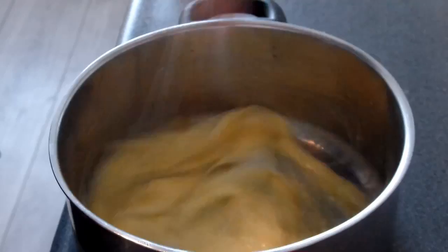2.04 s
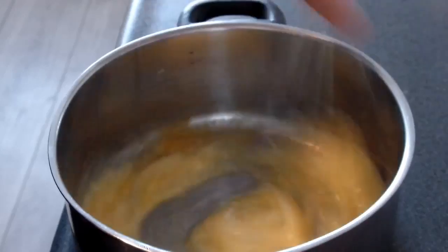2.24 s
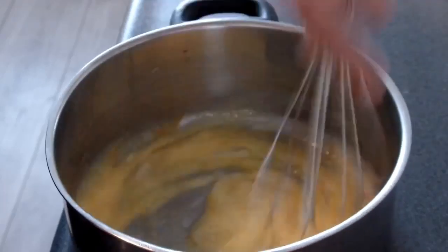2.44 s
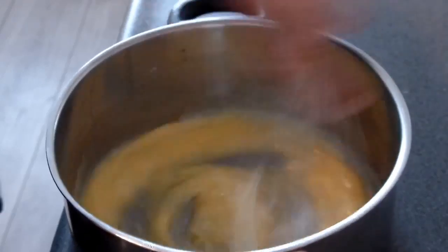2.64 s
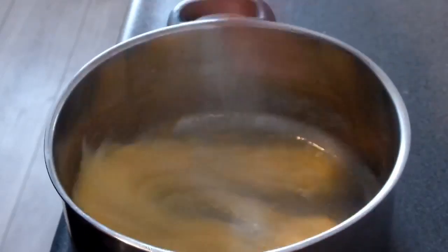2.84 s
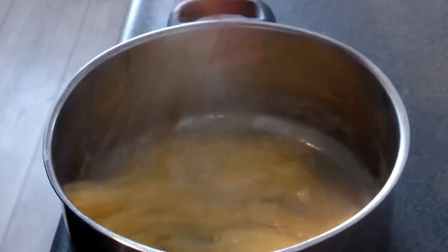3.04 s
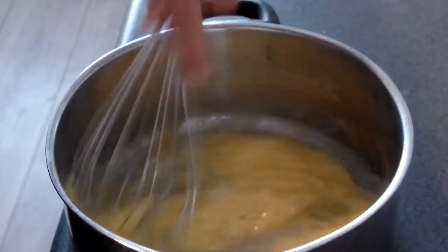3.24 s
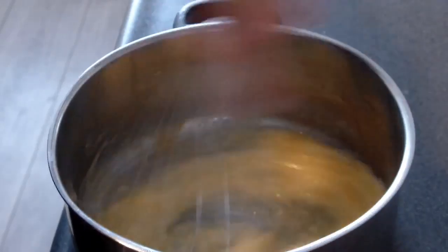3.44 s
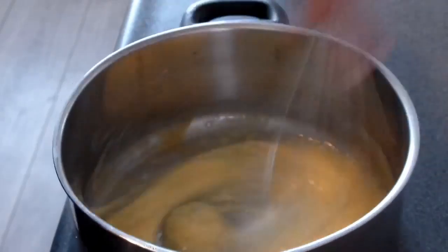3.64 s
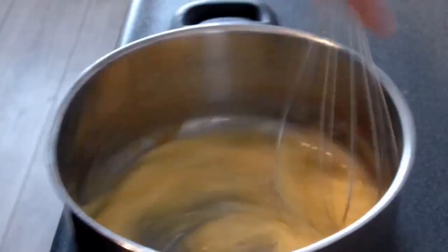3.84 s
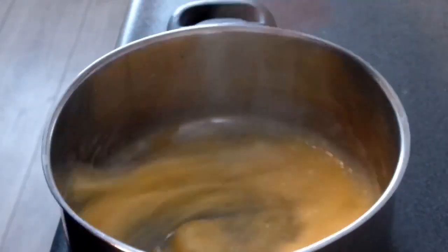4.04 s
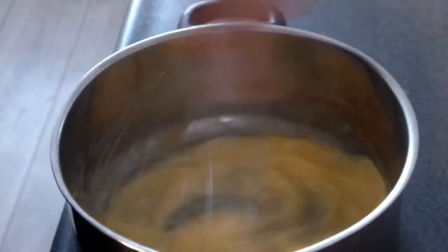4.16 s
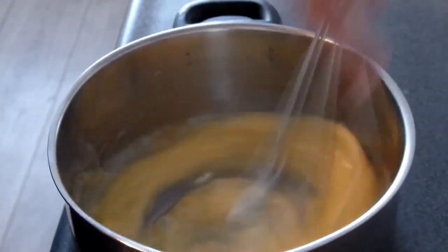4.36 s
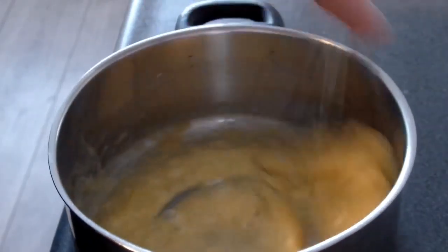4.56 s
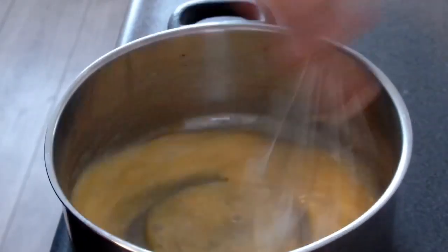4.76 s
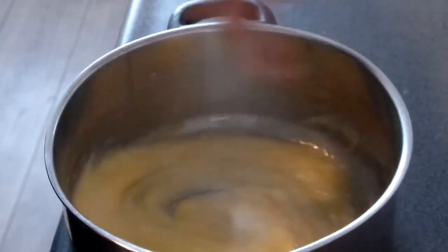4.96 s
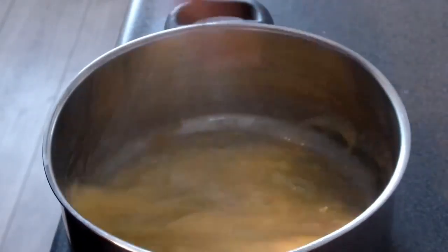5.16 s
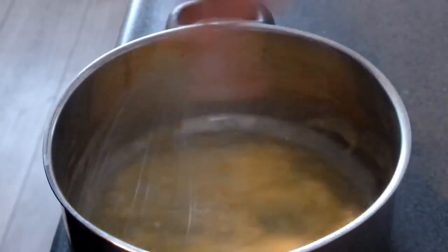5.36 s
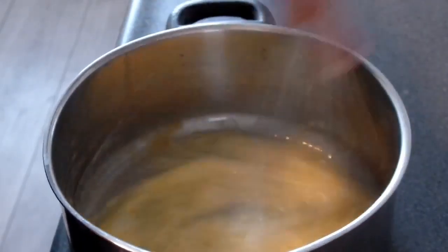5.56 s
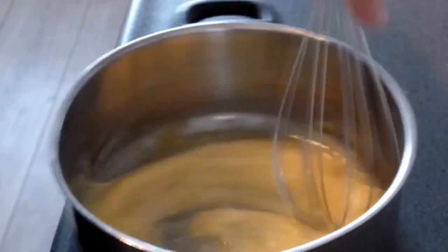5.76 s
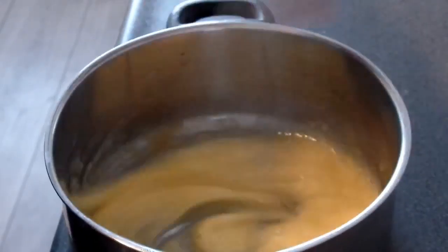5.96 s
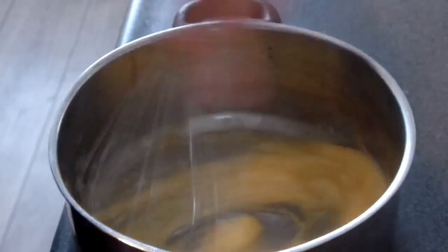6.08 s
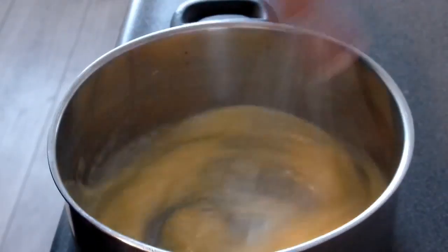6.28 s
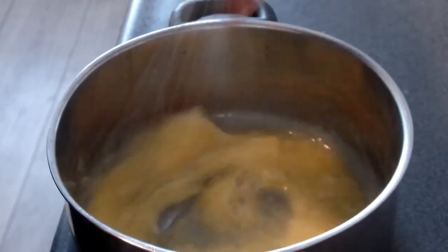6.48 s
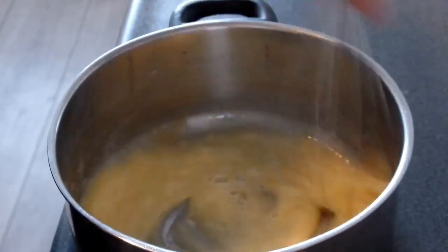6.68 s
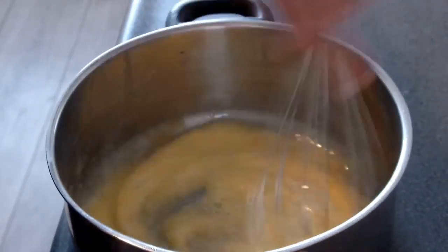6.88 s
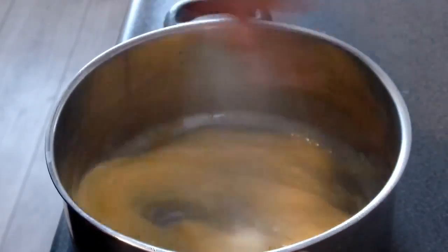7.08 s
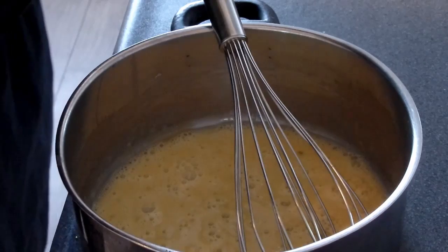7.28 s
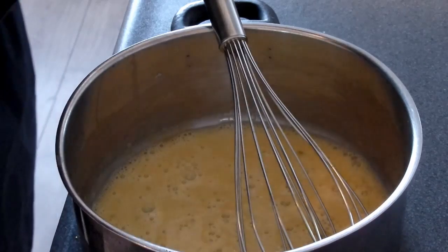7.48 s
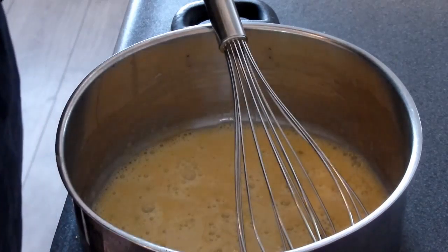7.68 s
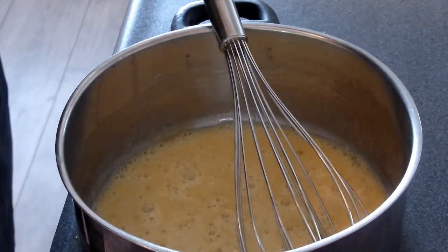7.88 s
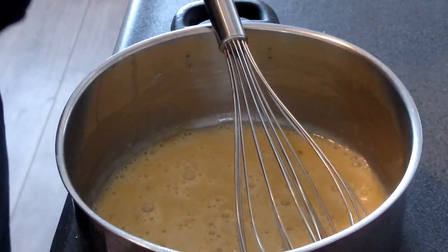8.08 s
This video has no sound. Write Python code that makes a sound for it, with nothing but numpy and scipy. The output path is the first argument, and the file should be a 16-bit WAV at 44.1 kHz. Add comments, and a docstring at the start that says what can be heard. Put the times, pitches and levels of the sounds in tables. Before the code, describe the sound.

Continuous brisk whisking in a metal pot, heard very near in a small tiled kitchen. Thin wires hit the steel wall in quick clustered clinks, dense and bright, fading within a quarter second so strokes run together. Light gritty scraping and liquid slosh fill the gaps, with faint low thumps as the pot rocks. Strokes start even, turn irregular and doubled, and finish hard and regular before weakening slightly.

```python
"""Whisk in a steel pot

Small hard kitchen, a phone close to a steel pot on the hob: a wire whisk beats eggs, about nine strokes a second.
At each turn the wires strike the wall one after another: noise cracks and decaying sines ring the damped steel.
Between turns stick-slip clicks scrape over the bottom and bands of noise churn as egg; weighty blows slap the egg
and rock the pot on the hob. A fading noise tail answers as tiles and cupboards, over a low uneven rumble."""
import sys
import numpy as np
from scipy import signal
from scipy.fft import rfft, irfft
from scipy.io import wavfile
from scipy.ndimage import uniform_filter1d

SR = 44100
rng = np.random.default_rng(int(sys.argv[2]) if len(sys.argv) > 2 else 0)


def transcribe(u):
    """Save the signal u as a 16-bit wav file named by the first command-line argument.

    u: samples, shape (n,) or (channels, n), limited to [-1, 1]; the rate is SR.
    q: integer samples, one column per channel.
    """
    v = np.clip(np.atleast_2d(u).T, -1, 1)
    q = np.round(v * 32767).astype(np.int16)
    wavfile.write(sys.argv[1], SR, q)


N = 358091
HZ = np.fft.rfftfreq(N, 1 / SR)

# blows on the wall; a weighty blow carries egg and hand behind it
# columns: t/s, strength level/dB, weight level against strength/dB, ring t60/s before the register's share
WALL_BLOWS = [(0.034, -6, -24, 0.19), (0.1414, -7, -20, 0.13), (0.2437, -7.5, -15, 0.22),
              (0.3536, -11, -11, 0.25), (0.451, -6, -15.5, 0.23), (0.5607, -8.5, -17.5, 0.23),
              (0.6592, -8, -19, 0.22), (0.7557, -14, -16, 0.22), (0.8624, -11, -13.5, 0.25),
              (0.964, -10.5, -14, 0.29), (1.0746, -10, -14, 0.26), (1.1814, -5.5, -7, 0.23),
              (1.29, -7, -13, 0.28), (1.3995, -6.5, -12.5, 0.23), (1.502, -7.5, -15, 0.25),
              (1.6092, -6.5, -11.5, 0.23), (1.725, -8, -14.5, 0.25), (1.8367, -9.5, -9.5, 0.24),
              (1.9642, -11, -17.5, 0.25), (2.0934, -9, -20.5, 0.35), (2.178, -15, -10, 0.37),
              (2.32, -18.5, -13, 0.25), (2.358, -12, -17, 0.45), (2.4212, -7.5, -8.5, 0.39),
              (2.6172, -10, -14.5, 0.44), (2.6618, -12.5, -11, 0.19), (2.6747, -16, -29, 0.25),
              (2.7509, -7, -13, 0.19), (2.8524, -16.5, -11, 0.25), (2.8802, -5, -14, 0.28),
              (2.9906, -8.5, -16, 0.28), (3.1004, -8, -13, 0.24), (3.2086, -6.5, -17.5, 0.24),
              (3.3224, -10.5, -12.5, 0.27), (3.464, -12.5, -12.5, 0.28), (3.5708, -5.5, -13, 0.22),
              (3.6707, -12, -10, 0.22), (3.711, -14, -16.5, 0.18), (3.7997, -12, -10, 0.29),
              (3.8104, -11.5, -15, 0.19), (3.93, -14, -7, 0.33), (3.9537, -15.5, -9, 0.33),
              (4.0491, -6, -12, 0.21), (4.0539, -9.5, -26, 0.3), (4.1589, -15, -10.5, 0.45),
              (4.199, -13, -15, 0.2), (4.3055, -5.5, -14, 0.2), (4.4151, -15, -12, 0.33),
              (4.5293, -13.5, -14, 0.28), (4.6418, -14.5, -17, 0.25), (4.687, -10.5, -16, 0.22),
              (4.7576, -11.5, -8.5, 0.41), (4.7784, -11.5, -13, 0.33), (4.795, -11.5, -8, 0.19),
              (4.8687, -14, -12, 0.25), (4.946, -21.5, 0.5, 0.22), (4.999, -13.5, -7.5, 0.29),
              (5.034, -17.5, -21, 0.29), (5.097, -20, -3, 0.35), (5.134, -8, -10, 0.3),
              (5.1496, -14, -25, 0.18), (5.2357, -2, -17, 0.28), (5.3479, -4.5, -17, 0.21),
              (5.4723, -5.5, -11, 0.2), (5.6062, -6.5, -9.5, 0.21), (5.7243, -7, -11, 0.25),
              (5.8182, -12.5, -9.5, 0.38), (5.8474, -15.5, -21, 0.25), (5.9486, -5.5, -11.5, 0.21),
              (6.0696, -14.5, -11.5, 0.25), (6.0793, -8, -13, 0.19), (6.2013, -7, -12.5, 0.29),
              (6.3039, -13.5, -9.5, 0.27), (6.3271, -12, -10.5, 0.27), (6.4967, -12, -14, 0.29),
              (6.6218, -20, 2.5, 0.3), (6.6348, -11.5, -10.5, 0.45), (6.7325, -9.5, -9.5, 0.33),
              (6.7448, -6.5, -15, 0.2), (6.7881, -12, -12, 0.36), (6.8294, -7.5, -10.5, 0.25),
              (6.8755, -12.5, -14, 0.13), (6.9846, -12, -12.5, 0.24), (7.1251, -2.5, -13.5, 0.21),
              (7.2205, -5, -12, 0.28), (7.3427, -6, -12, 0.25), (7.4438, -7, -13.5, 0.23),
              (7.5614, -9.5, -14, 0.27), (7.6817, -8.5, -15, 0.25), (7.797, -12.5, -11, 0.15),
              (7.8055, -12.5, -24, 0.29), (7.9149, -18, -13, 0.41), (7.9488, -17.5, -10, 0.22),
              (8.0416, -13.5, -10, 0.38)]
# wires dragged through the egg over the bottom; columns: t/s, slosh level/dB, scrape level/dB
STIRRING = [(0.0, -41, -32), (0.52, -41.5, -37), (0.9, -48, -41), (1.38, -44.5, -35.5),
            (2.15, -43.5, -39.5), (2.85, -36.5, -35), (3.48, -42.5, -39), (4.66, -39.5, -39),
            (5.2, -38.5, -37.5), (6.08, -43, -37), (6.56, -41.5, -43.5), (6.79, -40.5, -32),
            (7.08, -42.5, -37.5), (7.3, -43, -34), (7.73, -42, -42), (8.12, -39.5, -38)]
# registers of the pot; columns: low edge f/Hz, high edge f/Hz, share of the ring time, rise time constant/ms,
# crack level of a hard blow/dB
POT_REGISTERS = [(306, 740, 0.99, 7.2, 7.5), (963, 3480, 1.3, 2.6, 10.5), (3870, 4370, 1.25, 0.51, 12),
                 (5050, 10370, 1.465, 0.076, 7.5), (10100, 20000, 0.78, 0.19, 7.5)]
# strongest modes of pot and whisk; columns: f/Hz, level against the register/dB, t60/s
POT_MODES = [(487, -1, 0.099), (593.8, -4, 0.28), (781, -5.5, 0.21), (1249, -10, 0.13), (1380, 6, 0.047),
             (1796, -6.5, 0.24), (2528, -5, 0.12), (2440, -23, 0.16), (2833, -6.5, 0.17),
             (3837, -5.5, 0.56), (4010, -9, 0.34), (3945, -17, 0.26), (4540, -14, 0.43), (3985, 2.5, 0.18),
             (4554, 1, 0.26), (4400, -13, 0.32), (4600, -10.5, 0.37), (5180, -10, 0.2), (5350, -11, 0.2),
             (5690, -27, 0.17), (5930, -4, 0.066), (6040, -30.5, 0.14), (6290, -27, 0.16),
             (6900, -28, 0.097), (7420, -5, 0.059), (7970, -2.5, 0.068), (8190, 0, 0.034),
             (8600, -4.5, 0.13), (9080, -7.5, 0.12)]
# colour of the dense modes; columns: f/Hz, level per Hz/dB
STEEL_COLOUR = [(180, -42), (300, -14.5), (530, -11.5), (770, -2.5), (1080, -1), (1250, 0), (1520, -5),
                (1820, -1), (3380, -1), (3980, 3.5), (4830, 1), (8000, 2), (10200, -0.5), (13900, 10),
                (14600, 3.5)]
# colour of the room's rumble; columns: f/Hz, level per Hz/dB
RUMBLE_COLOUR = [(13, -39), (22, -4), (59, -30), (130, -1.5), (188, -16.5), (312, -2), (411, -21), (500, 1),
                 (650, -17), (1100, -120)]
# how unlike the two ports hear the pot; columns: f/Hz, side minus mid level/dB
PORT_WIDTH = [(60, -10), (110, -10), (200, -8), (380, -10), (700, -12), (1290, -15), (2380, -17),
              (4400, -17.5), (8120, -16), (15000, -5)]
# level against strength for a blow of usual weight; columns: body, wall, rim, bright steel, wire tips level/dB
REGISTER_VOICE_DB = (-19, -12.5, -12, -2, -7)
# how much weight feeds the low registers; columns: body, wall (dB per dB of extra weight)
LOW_WEIGHT_SHARE = (1.1, .3)

USUAL_WEIGHT_DB = -15
SPOT_SCATTER_DB = 1.5  # each blow lands on another spot and favours other registers
# slap and rocking: level of a usual blow, lag behind the blow, dB per dB of extra weight
SLAP_DB, SLAP_LAG_S, SLAP_SHARE = -28, 0.014, .8
HOB_DB, HOB_LAG_S, HOB_SHARE = -36, 0.018, .9
THUD_SCATTER_DB = 3  # slap and rocking differ from blow to blow
RUMBLE_DB, RUMBLE_SWING_DB = -62, 8.45  # middle level, spread of its wandering
ECHO_DB, ECHO_T60_S = -15, .3
TOP_HZ = 14450


def undb(db):
    """Amplitude of a level in dB."""
    return 10 ** (np.asarray(db) / 20)


def unit(x):
    """Scale to an rms of 1."""
    return x / np.sqrt(np.mean(x ** 2))


def shape(points):
    """Gain at every frequency from (f/Hz, level/dB) points."""
    hz, db = np.transpose(points)
    return undb(np.interp(np.log(HZ + 1), np.log(hz), db))


def band(lo_hz, hi_hz, order=8):
    """Band-pass gain at every frequency; a higher order is steeper."""
    below = (lo_hz / (HZ + 1)) ** (2 * order)
    above = (HZ / hi_hz) ** (2 * order)
    return 1 / np.sqrt((1 + below) * (1 + above))


def colour(x, gain):
    """Filter by a gain at every frequency."""
    return irfft(rfft(x) * gain, N)


def noise(gain):
    """Coloured noise with an rms of 1."""
    return unit(colour(rng.standard_normal(N), gain))


def walk(rate_hz):
    """Random levels held 1 / rate_hz seconds and slewed twice; rms 1."""
    hold = int(SR / rate_hz)
    steps = np.repeat(rng.standard_normal(N // hold + 1), hold)
    return unit(uniform_filter1d(uniform_filter1d(steps, hold), hold)[:N])


def fade(t, t60):
    """Exponential decay by 60 dB in t60 seconds, never quicker than 0.03 s."""
    return np.exp(-np.log(1000) * t / max(t60, .03))


def impulses(times, dbs):
    """One click of the given level at each moment."""
    clicks = np.zeros(N)
    clicks[(times * SR).astype(int)] = undb(dbs)
    return clicks


def swells(times, dbs, rise_s, t60):
    """A soft rise and a decay from each moment."""
    t = np.arange(int(SR / 2)) / SR
    swell = (1 - np.exp(-t / rise_s)) * fade(t, t60)
    return signal.fftconvolve(impulses(times, dbs), swell)[:N]


def kitchen(dry):
    """Diffuse echo from tiles and cupboards, its treble dying first, over an uneven low rumble."""
    t = np.arange(SR) / SR
    white = rng.standard_normal(SR)
    dull = signal.lfilter([.3], [1, -.7], white)
    tail = dull * fade(t, ECHO_T60_S) + (white - dull) * fade(t, 0.22 * ECHO_T60_S)
    tail = tail * (1 - np.exp(-t / 0.0093))
    rumble = undb(RUMBLE_DB + RUMBLE_SWING_DB * walk(12)) * noise(shape(RUMBLE_COLOUR))
    echo = signal.fftconvolve(dry, tail / np.linalg.norm(tail))[:N]
    return undb(ECHO_DB) * echo + rumble


def slosh(db, waver_db=4, tilt_db=-1):
    """Egg round the pot: a soft wet wash of narrow noise bands, each wavering at random, surging after every blow."""
    centres_hz = 330 * 2 ** np.arange(0, 3.4, 1 / 3)
    wash = 0
    for k, hz in enumerate(centres_hz):
        # the two edges almost meet: a narrow hump
        narrow = colour(rng.standard_normal(N), band(hz / 1.19, hz * 0.85, order=3))
        wash = wash + narrow * undb(waver_db * walk(18) + tilt_db * k)
    s, strength_db = np.transpose(WALL_BLOWS)[:2]
    surge = 1.1 + unit(swells(s, 0.94 * strength_db, 0.0077, 0.15))
    return unit(colour(wash, shape(STEEL_COLOUR)) * surge) * undb(db)


def thuds():
    """The egg slaps the wall with a dull lumpy push; the rocking pot makes the hob top boom near 120 Hz."""
    s, db, weight_db = np.transpose(WALL_BLOWS)[:3]
    extra_db = weight_db - USUAL_WEIGHT_DB
    slap_chance_db, hob_chance_db = THUD_SCATTER_DB * rng.standard_normal((len(s), 2)).T
    slap_db = slap_chance_db + db + SLAP_DB + SLAP_SHARE * extra_db
    hob_db = hob_chance_db + db + HOB_DB + HOB_SHARE * extra_db
    egg = noise(band(208.0, 376.0, order=3)) * undb(0.82 * walk(25))
    boom = np.sin(2 * np.pi * np.cumsum(119 + 9 * walk(8.9)) / SR)
    boom = boom + .5 * noise(band(110.0, 160.0, order=2))
    slap = swells(s + SLAP_LAG_S, slap_db, 0.032, 0.19) * egg
    return slap + swells(s + HOB_LAG_S, hob_db, 0.038, 0.2) * boom


def skid(lead_db=-21, lead_s=0.0067):
    """Level of the scrape that builds up as the wires run up the curve towards each blow."""
    s, db = np.transpose(WALL_BLOWS)[:2]
    decay = np.exp(-np.arange(SR // 8) / SR / lead_s)
    # a decay run backwards in time is a build-up
    return signal.fftconvolve(impulses(s, db + lead_db)[::-1], decay)[:N][::-1]


def scrape(gain, slips_a_second=4000, scatter_db=5):
    """Tiny stick-slip clicks excite the steel; its strong modes show as narrow peaks."""
    slips = rng.random(N) < slips_a_second / SR
    clicks = slips * undb(scatter_db * rng.random(N)) * rng.standard_normal(N)
    peaks = sum(undb(db) / np.abs(1 + 1j * (HZ - f) * t60 / 5.3) for f, db, t60 in POT_MODES)
    steel = shape(STEEL_COLOUR) * band(1340.0, 7400.0, order=1) * (1 + undb(-4.5) * peaks)
    return unit(colour(clicks, steel)) * gain


def wires(luck, within_ms, scatter_db=4, chatter_ms=40, chatter_db=-9, lead_db=6):
    """Half the contacts are wires landing in quick turn, half their weaker chatter afterwards; total energy 1."""
    late = np.arange(luck.shape[1]) % 2
    at = (np.where(late, chatter_ms, within_ms) * luck[0] ** 1.5 * SR / 1000).astype(int)
    at[0] = 0
    lead = lead_db * (np.arange(len(at)) == 0)
    level_db = scatter_db * luck[1] + chatter_db * late + lead
    train = np.zeros(at.max() + 1)
    np.add.at(train, at, undb(level_db) * np.sign(luck[2]))
    return train / np.linalg.norm(train)


def blows(ring_db=-14, crack_t60=0.062, spot_db=1.5, hard_db=-10, hard_within_ms=5):
    """Every wire contact cracks and rings the strong modes; the dense modes fill into a smooth fading wash."""
    t, out = np.arange(int(SR / 2)) / SR, np.zeros(N + SR)
    t_mode = t[:8192]  # the strong modes sound for 0.19 s at most
    low_hz, high_hz, share, rise_ms, crack_db = np.transpose(POT_REGISTERS)
    dense = np.array([noise(shape(STEEL_COLOUR) * band(lo, hi)) for lo, hi in zip(low_hz, high_hz)])
    mode_hz, mode_db, mode_t60 = np.transpose(POT_MODES)
    home = np.clip(np.searchsorted(low_hz, mode_hz) - 1, 0, None)  # register of each mode
    # the low registers swell in more slowly than the high ones
    rise = 1 - np.exp(-1000 * t / np.maximum(rise_ms, .1)[:, None])
    favours = SPOT_SCATTER_DB * rng.standard_normal((len(WALL_BLOWS), len(POT_REGISTERS)))
    for (s, db, weight_db, t60), favour_db in zip(WALL_BLOWS, favours):
        luck = np.vstack([rng.random(28), rng.standard_normal((2, 28))])  # 28 contacts: time, level, sign
        spot, start = rng.standard_normal((2, len(mode_hz))), rng.integers(N - len(t))
        # a glancing blow cracks less and its wires land over a longer time
        soft_db = max(hard_db - db, 0)
        land_ms = hard_within_ms * undb(0.79 * soft_db)
        steel = dense[:, start:start + len(t)]
        ring = steel * undb(crack_db - 0.087 * soft_db)[:, None] * fade(t, crack_t60)
        # the spot struck shifts each mode's pitch and level a little
        spot_hz = mode_hz * (1 + 0.0031 * spot[0])
        spot_gain = undb(mode_db + spot_db * spot[1])
        for r, f, g, decay in zip(home, spot_hz, spot_gain, mode_t60):
            ring[r, :8192] += g * np.sin(2 * np.pi * f * t_mode) * fade(t_mode, decay)
        # the wash is the same steel noise run backwards, filling in while the wires land
        fill = 1 - np.exp(-t * 1000 / (1.14 * land_ms))
        wash = steel[:, ::-1] * [fade(t, t60 * k) for k in share] * fill
        extra_db = np.r_[LOW_WEIGHT_SHARE, 0, 0, 0] * (weight_db - USUAL_WEIGHT_DB)
        gains = undb(db + ring_db + favour_db + REGISTER_VOICE_DB + extra_db)
        contacts = signal.fftconvolve(gains @ (ring * rise), wires(luck, land_ms))[:len(t)]
        i = int(s * SR)
        out[i:i + len(t)] += contacts + gains @ (wash * rise)
    return colour(out[:N], band(280.0, SR / 2, order=3))


def ports(mid):
    """Short reflections reach the phone's two ports unequally and shift as the whisk travels round the pot."""
    side = 0
    for _ in range(2):
        turn = np.cumsum(110 * walk(25)) / SR  # wandering angle, radians
        for blend in (np.cos(turn), np.sin(turn)):
            paths = rfft(rng.standard_normal(N) * fade(np.arange(N) / SR, .05))
            # level the broad spectrum, keep the fine comb of the reflections
            broad = np.sqrt(2 * uniform_filter1d(np.abs(paths) ** 2, size=1500))
            side = side + blend * colour(mid, paths / broad)
    side = colour(side, shape(PORT_WIDTH) * band(60., SR / 2, order=2))
    return np.array([mid + side, mid - side])


def scene():
    """Pot, egg and hob with the kitchen's answer, as they reach the two ports close by."""
    s, *columns = np.transpose(STIRRING)
    slosh_db, scrape_db = (np.interp(np.arange(N) / SR, s, c) for c in columns)
    pot = blows() + thuds() + scrape(undb(scrape_db) + skid()) + slosh(slosh_db)
    # the bounce off the worktop thins a narrow band near 1.1 kHz
    worktop = 1 - .7 / (1 + ((HZ - 1090) / 50.) ** 2)
    return ports(colour(pot + kitchen(pot), worktop))


def record(dry):
    """The phone cuts the top steeply: an elliptic low-pass at TOP_HZ."""
    top_cut = signal.ellip(10, .2, 80, TOP_HZ, fs=SR, output="sos")
    return signal.sosfilt(top_cut, dry)


dry = scene()
out = record(dry)
transcribe(out)
```